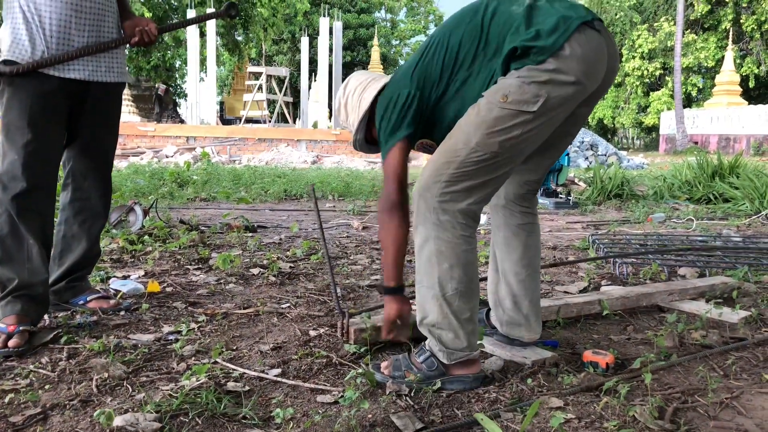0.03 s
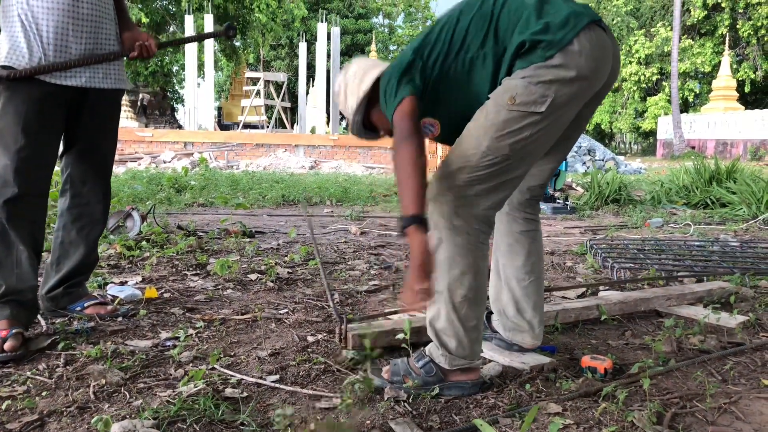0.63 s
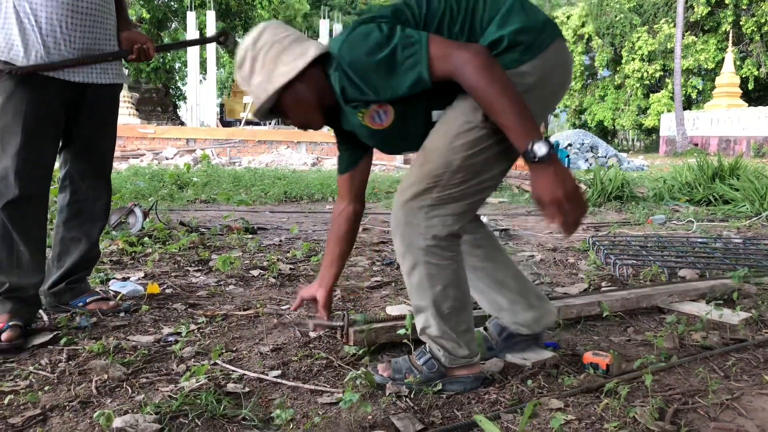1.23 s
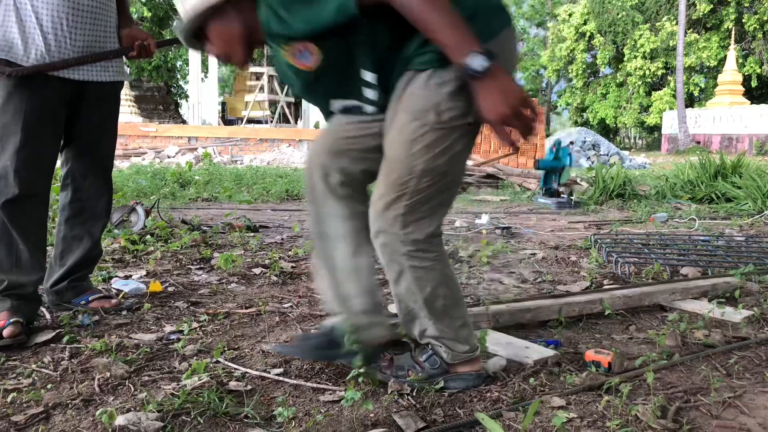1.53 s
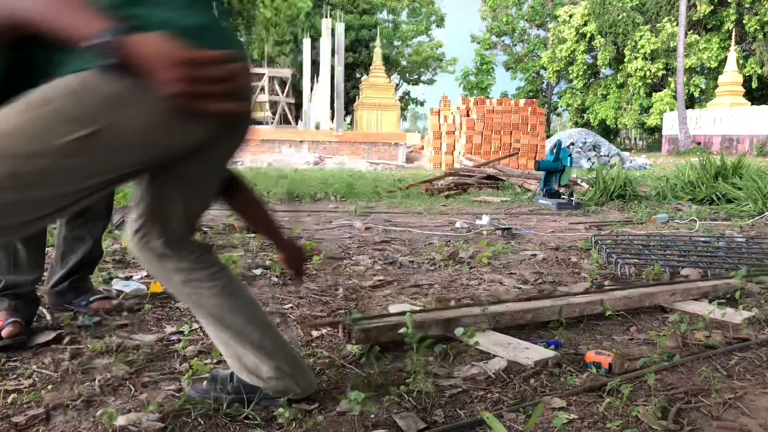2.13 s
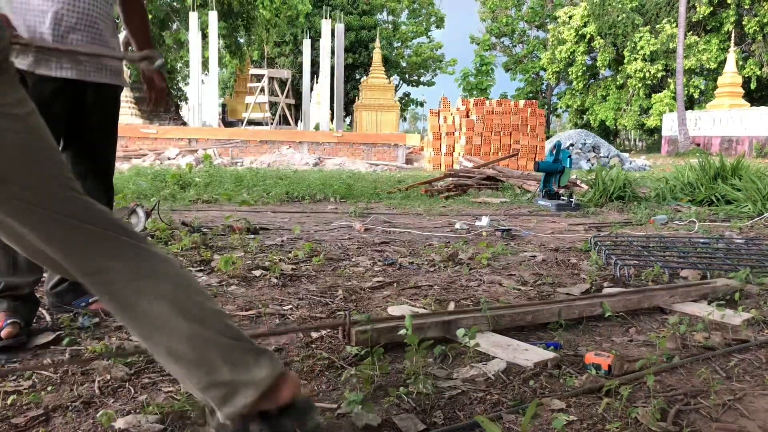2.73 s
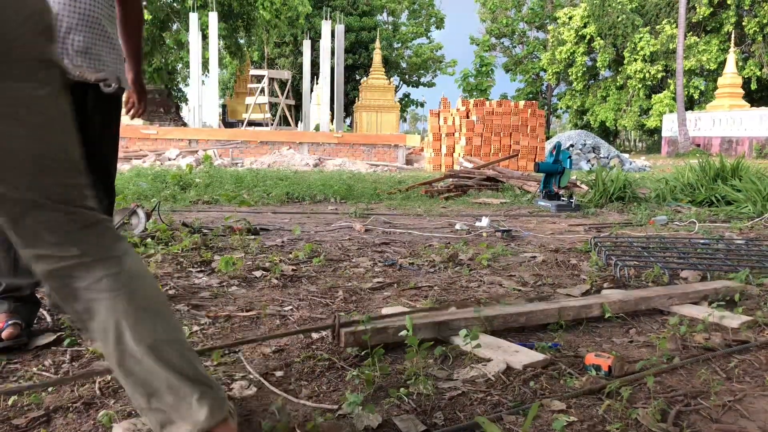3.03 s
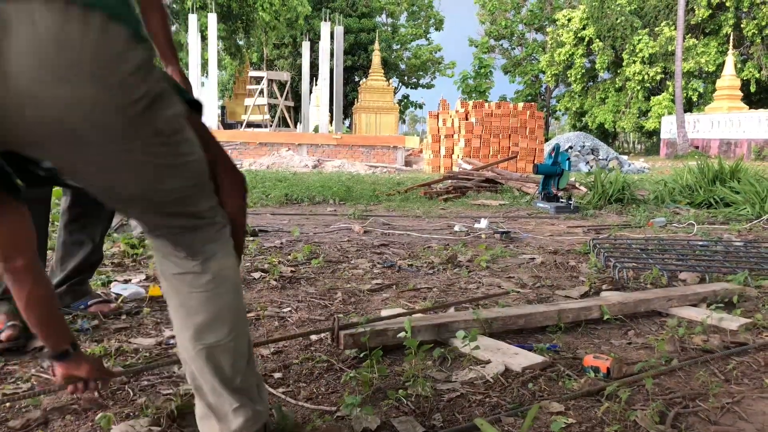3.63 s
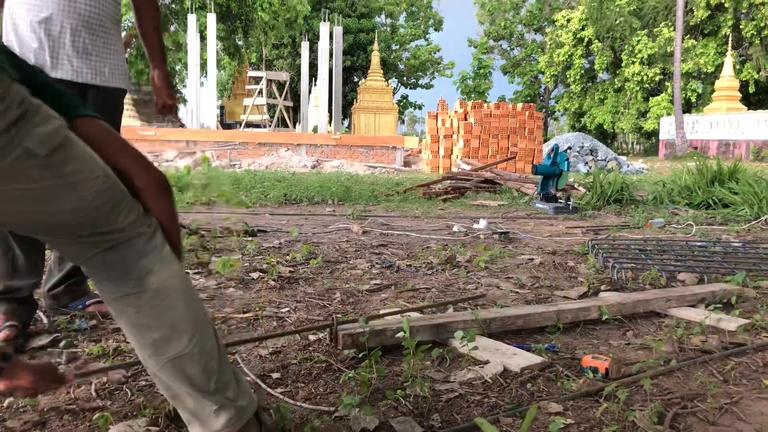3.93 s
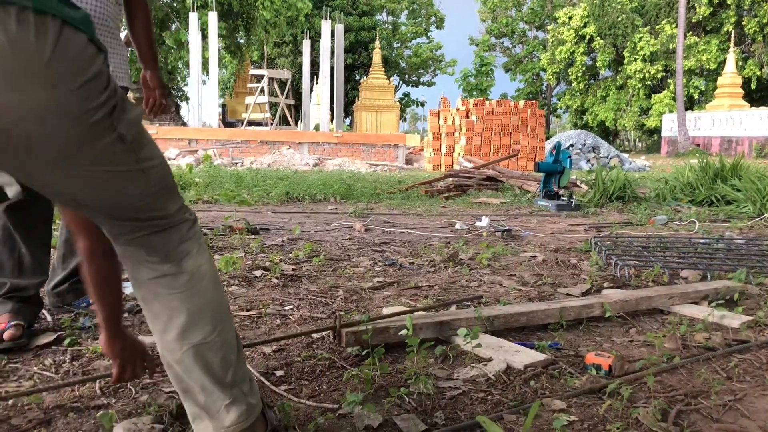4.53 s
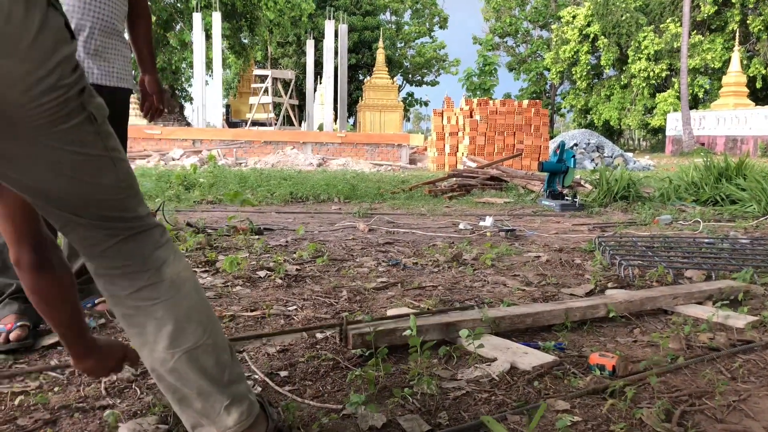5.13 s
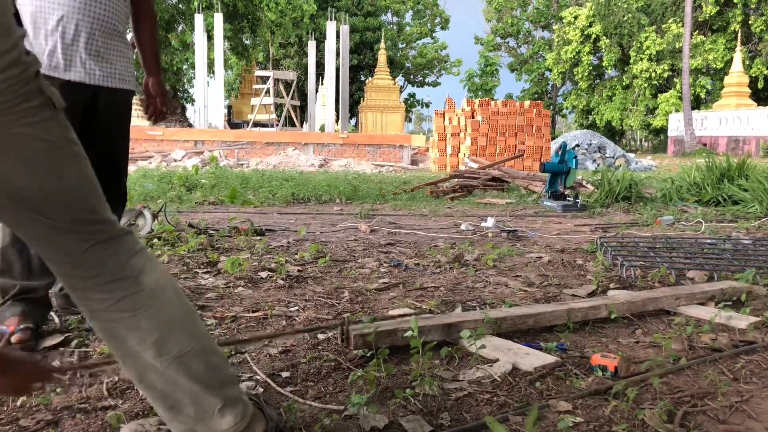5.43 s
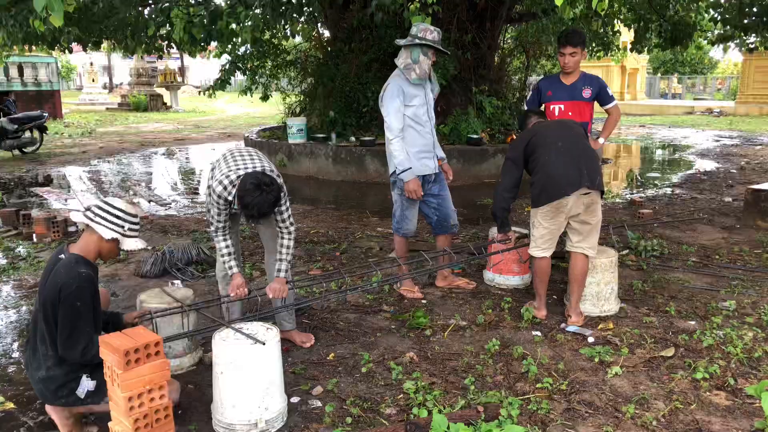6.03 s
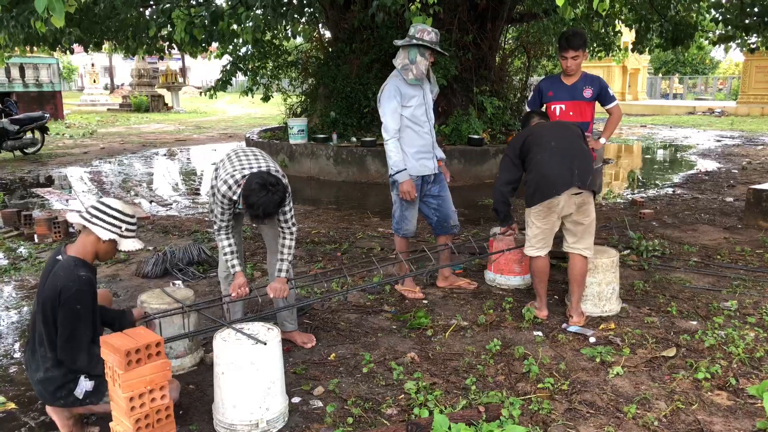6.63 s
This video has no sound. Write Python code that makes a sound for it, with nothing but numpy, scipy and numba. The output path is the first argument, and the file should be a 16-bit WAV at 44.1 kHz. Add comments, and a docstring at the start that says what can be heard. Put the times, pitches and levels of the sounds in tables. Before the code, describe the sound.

Steel reinforcing bars are handled near the microphone on bare ground outdoors. A few wooden knocks and dull clacks come first, followed by a swelling metallic rasp with screeches, ringing and low chatter as a bar drags through the soil. Shuffling steps, a small scrape and several clinks lead to another harsh slide of steel on steel. It gives way suddenly to quieter outdoor air and light clicks of thin rods.

```python
"""Long steel reinforcing bars are drawn over each other and through a bending jig on a building site. Stick-
slip friction drives their bending modes, so they scrape and ring; impacts make them clink, and bare soil damps
them to a dull slap. A tool knocks on the timber jig; feet shuffle, and whipping bars thud low. Near the end the
scene changes to a quieter spot under trees, where thin bars click lightly together."""
import sys
import numpy as np
from scipy import signal
from scipy.fft import rfft, irfft
from scipy.io import wavfile
from scipy.ndimage import uniform_filter1d, map_coordinates
from numba import njit

SR = 44100
rng = np.random.default_rng(int(sys.argv[2]) if len(sys.argv) > 2 else 0)


def waveform_to_disk(signal):
    """Save audio, clipped to [-1, 1], as 16-bit WAV at the path in sys.argv[1]."""
    frames = np.transpose(np.atleast_2d(signal))
    scaled = np.clip(frames, -1, 1) * 32767
    samples = np.round(scaled).astype(np.int16)
    wavfile.write(sys.argv[1], SR, samples)


N = 303849
T = np.arange(N) / SR
SCENE_CHANGE_S = 6.087
HAND_BAR_HZ = 1.1505  # base of the mode series of the bar in the hand

# The longest-ringing modes of the bar in the hand, in Hz.
HAND_MODES = [2342, 3600, 4177, 4400, 4570, 5030, 5240, 5954, 6320, 6580, 7520, 10372]
# Spectral envelope of the steel. Each row: frequency in Hz, relative level in dB.
STEEL = [(280, -28.5), (590, -6.5), (1000, -6), (1350, -7.5), (1730, -4), (2250, -6), (3980, -1.5),
         (8650, -9.5), (15100, -25.5)]
# A bar slaps soil or timber. Each row: start in seconds, level in dB, band centre in Hz.
SLAPS = [(.003, -33, 514), (.088, -35, 500), (.987, -25.5, 845), (1.009, -22, 730), (1.116, -34, 560),
         (1.338, -34.5, 586), (1.401, -35.5, 540), (1.438, -31, 564), (2.01, -32, 585), (2.049, -31, 650),
         (3.377, -21, 1010), (3.883, -31.5, 890), (4.875, -23.5, 1470), (4.898, -26.5, 845),
         (5.52, -22, 890), (5.735, -16.5, 790), (6.49, -43, 930), (6.665, -41.5, 1000)]
# A dragged bar meets a clod. Each row: start and length in seconds, level in dB, band centre in Hz.
BUMPS = [(2.108, 0.053, -26, 730), (2.159, 0.032, -21.5, 644), (2.231, 0.1, -29.5, 610),
         (2.538, 0.048, -21.5, 680), (2.646, 0.0088, -17, 770), (2.742, 0.061, -18, 767),
         (2.875, .045, -19, 650), (2.928, 0.044, -10, 600), (3.018, 0.017, -17, 610),
         (3.076, 0.041, -13, 517), (3.145, 0.014, -21, 625), (3.224, 0.027, -16.5, 635),
         (4.001, 0.043, -29, 746), (4.105, 0.034, -29.5, 780)]
# Steel slides on steel. Each row: start, fastest moment and stop in seconds, drive level in dB,
# rise and fall in dB per second, bass shelf and treble offset in dB, dB of treble lost per dB
# of level, relative level of the soil's grinding in dB.
SLIDES = [(2.098, 2.796, 2.9, -16.5, 20.5, 10, -2.5, -4, 0, -14),
          (2.846, 3.037, 5, -14.5, 3, 46.5, -4.5, -1.5, .4, -8.5),
          (3.846, 4.021, 4.21, -28.5, 53, 83, -3.5, -4, 0, -10.5),
          (5.176, 5.622, 5.75, -17, 58, 80, 1.5, -3, 0.8, -7),
          (5.65, 5.724, 6.15, -13, 75, 37.5, -1.5, -1, 1.5, -21)]


def undb(db):
    """Amplitude ratio for a level in decibels."""
    return 10 ** (np.asarray(db) / 20)


def unit(x):
    """Normalisation to an rms of 1."""
    return x / np.sqrt(np.mean(x ** 2))


def unit_energy(x):
    """A response of unit energy preserves the power of white noise."""
    return x / np.sqrt(np.sum(x ** 2))


def add(out, start_s, x):
    """Superposition of a short sound on the mix."""
    i = max(int(start_s * SR), 0)
    out[i:i + len(x)] += x[:N - i]


def peak_level(x, db, size=220):
    """Scaling that brings the highest short-time rms to the given level."""
    return x * undb(db) / np.sqrt(uniform_filter1d(x ** 2, size).max())


def colour(x, spectrum, size=4096):
    """Minimum-phase filter through (Hz, dB) points, built by folding the cepstrum."""
    hz, db = np.transpose(spectrum)
    grid = np.maximum(np.fft.rfftfreq(size, 1 / SR), 1)
    magnitude = undb(np.interp(np.log(grid), np.log(hz), db))
    cepstrum = irfft(np.log(magnitude))
    cepstrum[1:size // 2] *= 2
    cepstrum[size // 2 + 1:] = 0
    response = irfft(np.exp(rfft(cepstrum)))
    return signal.oaconvolve(x, response)[:len(x)]


def band(x, hz, ratio, order=2):
    """Band-pass filter from hz / ratio to hz * ratio."""
    edges = [hz / ratio, min(hz * ratio, SR / 2 - 1000)]
    return signal.sosfilt(signal.butter(order, edges, "band", fs=SR, output="sos"), x)


def brighten(x, db, corner_hz=7500):
    """Treble shelf: a harder contact carries more high-frequency energy."""
    top = signal.sosfiltfilt(signal.butter(3, corner_hz, "high", fs=SR, output="sos"), x)
    return x + (undb(db) - 1) * top


def walk(rate):
    """Smooth random modulation of rms 1, with `rate` new values a second."""
    step = int(SR / rate)
    stairs = np.repeat(rng.standard_normal(N // step + 1), step)[:N]
    return unit(uniform_filter1d(stairs, step))


def hump(middle_s, length_s):
    """Half-cosine envelope that swells and fades."""
    return np.cos(np.pi * np.clip((T - middle_s) / length_s, -.5, .5))


def swells(rows):
    """Summed envelope of several humps, each at its own level."""
    return sum(undb(db) * hump(middle, length) for middle, length, db in rows)


def friction(rate, spread_db, judder_db, judder_rate):
    """Stick-slip force: tiny uneven impulses, `rate` a second, come in fits as ribs and grit catch."""
    hits = (rng.random(N) < rate / SR) * rng.standard_normal(N)
    strength_db = spread_db * rng.standard_normal(N) + judder_db * np.tanh(walk(judder_rate))
    return unit(hits * undb(strength_db))


def crack(t60, size=SR):
    """Contact transient: noise that decays exponentially, by 60 dB in t60 seconds."""
    decay = np.exp(-np.log(1000) * T[:size] / t60)
    return unit_energy(rng.standard_normal(size) * decay)


@njit
def ring(hz, gain, t60, size):
    """Free vibration as a sum of damped sinusoids."""
    out, phasors = np.zeros(size), gain + 0j
    pole = np.exp((2j * np.pi * hz - np.log(1000) / t60) / SR)
    for i in range(size):
        for k in range(len(phasors)):
            phasors[k] *= pole[k]
            out[i] += phasors[k].imag
    return out


def bar(base_hz, t60, split=0.0041, damping_hz=11000, size=SR):
    """Bending modes of a rod rise with the square of their number, a little slower at the top."""
    hz = base_hz * (np.arange(12, 122) + .5) ** 2
    hz = hz / np.sqrt(1 + hz / 200000)
    # the ribs give the second bending plane a weaker set of slightly detuned modes
    weight = np.outer([1, .5], hz ** .25).ravel()
    hz = np.concatenate([hz, hz * (1 + split * rng.standard_normal(len(hz)))])
    # the point of contact decides how strongly each mode takes part
    gain = weight * np.cos(2 * np.pi * rng.random(len(hz)))
    return unit_energy(ring(hz, gain, t60 / (1 + (hz / damping_hz) ** 2), size))


def strong_modes(modes, t60, damping_hz=11000):
    """A few prominent resonances; damping grows with frequency, so high ones are weak and brief."""
    hz = np.array(modes, float)
    rolloff = 1 / (1 + (hz / damping_hz) ** 2)
    return unit_energy(ring(hz, rolloff * rng.choice([-1, 1], len(hz)), t60 * rolloff, SR))


def effort(slide):
    """Level follows sliding speed: in dB, a steady rise to 0 at the fastest moment, then a fall."""
    _, fastest, _, _, rise, sag = slide[:6]
    return -rise * np.maximum(fastest - T, 0) - sag * np.maximum(T - fastest, 0)


def stroke(slide, grip_s=0.061, let_go_s=0.091):
    """Amplitude envelope of a slide, from taking hold to coming to rest."""
    start, _, stop, db = slide[:4]
    moving = np.clip((T - start) / grip_s, 0, 1) * np.clip((stop - T) / let_go_s, 0, 1)
    return moving * undb(db + effort(slide))


def outdoors(spectrum, db, waver_db=1.1):
    """Leaves and distant traffic add incoherently to a gently wavering, coloured noise."""
    return unit(colour(rng.standard_normal(N), spectrum)) * undb(db + waver_db * walk(rate=7))


def site_air():
    """Broadband ambient noise on the open site."""
    # Ambient spectrum. Each row: frequency in Hz, relative level in dB.
    air_spectrum = [(25, -8.5), (75, 1), (364, -2), (569, -3.5), (3870, -9), (8980, -18.5), (16000, -25.5)]
    # Ambient loudness. Each row: time in seconds, level in dB.
    air_level = [(0, -48), (3.8, -50), (4.3, -45.5)]
    times, levels_db = np.transpose(air_level)
    return outdoors(air_spectrum, np.interp(T, times, levels_db))


def shade_air():
    """Ambient noise under the trees, weighted to low frequencies."""
    # Ambient spectrum. Each row: frequency in Hz, relative level in dB.
    shade_spectrum = [(18, -45), (30, -10), (59, -2), (245, -8), (473, -20), (666, -16), (1070, -14),
                      (1430, -29), (3000, -25), (16000, -39.5)]
    return outdoors(shade_spectrum, db=-46)


def rustles():
    """Dry leaves and grit, brushed by hands and bars, emit fits of tiny impulses."""
    # Brushing movements. Each row: middle and length in seconds, level in dB.
    brushes = [(.11, 0.13, -49.5), (.36, 0.039, -49.5), (.555, 0.036, -53), (5.22, 0.022, -44),
               (6.125, .07, -50.5), (6.48, .1, -53)]
    crackle = friction(rate=3000, spread_db=1, judder_db=7, judder_rate=60)
    return swells(brushes) * unit(band(crackle, hz=5200, ratio=1.78))


def grind(gain, grit_db, lumps_rate, lumps_db=2.5):
    """Friction on soil grinds it and cracks grit; lumps modulate the amplitude."""
    # Spectrum of grinding soil. Each row: frequency in Hz, relative level in dB.
    soil_spectrum = [(200, -23), (462, -0.5), (600, 4), (824, -2.5), (1200, -6.5), (2000, -7), (2800, -58)]
    soil_force = friction(rate=1500, spread_db=1, judder_db=1.5, judder_rate=70)
    grit_force = friction(rate=600, spread_db=3, judder_db=3, judder_rate=25)
    soil = unit(colour(soil_force, soil_spectrum))
    grit = unit(band(grit_force, hz=4500, ratio=2))
    lumps = unit(undb(lumps_db * walk(lumps_rate)))
    return gain * lumps * (soil + undb(grit_db) * grit)


def shuffles(rumble_db=-2, soil_db=-9, resting_db=-53):
    """Each shift of stance swells a low, uneven rumble and adds the friction of soles on soil."""
    # Movements of feet and clothes. Each row: middle and length in seconds, base level in dB.
    shifts = [(0.12, 0.23, -42), (1.85, 0.15, -36), (2.392, 0.21, -33), (3.247, 0.73, -31.5),
              (4.13, 0.47, -34.5), (4.476, 0.17, -35.5), (4.918, 0.34, -28.5), (5.183, 0.3, -30),
              (5.656, 0.87, -33.5), (6.59, 0.43, -46)]
    # Spectrum of the rumble. Each row: frequency in Hz, relative level in dB.
    feet_spectrum = [(21, -30), (35, -13), (59, 1), (140, 0), (258, -3), (400, -11), (700, -73.5)]
    moving = swells(shifts)
    uneven_noise = rng.standard_normal(N) * undb(4.3 * walk(rate=35))
    rumble = unit(colour(uneven_noise, feet_spectrum))
    scuff = grind(moving * undb(soil_db), grit_db=-14, lumps_rate=35)
    return (moving * undb(rumble_db) + undb(resting_db)) * rumble + scuff


def thuds(boost_db=1.5, glide_s=0.0108, peak_s=0.011, scuff_t60=0.099, size=9000):
    """A soft impact excites only low frequencies: a few cycles that sink in pitch, and a scuff."""
    # Low thuds of a whipping bar, a slow bending wave. Each row: start in seconds, level before the boost in
    # dB, nominal pitch in Hz.
    whip_thuds = [(1.615, -40, 190), (1.773, -27, 89), (1.822, -31, 177), (2.901, -23.5, 311),
                  (3.148, -26, 327), (3.275, -26.5, 150), (3.312, -24.5, 87), (3.506, -32.5, 129),
                  (4.3, -24, 147.4), (4.374, -32, 172), (4.431, -35, 230), (4.543, -30, 210),
                  (4.624, -25.5, 139), (4.675, -34, 186), (4.969, -28.5, 143), (5.144, -31.5, 212),
                  (5.22, -33, 162), (5.722, -25, 242)]
    out, t = np.zeros(N), T[:size]
    swell = (t / peak_s * np.exp(1 - t / peak_s)) ** 3
    for start, hit_db, hz in whip_thuds:
        sinking_hz = hz * (0.72 + 0.96 * np.exp(-t / glide_s))
        phase = 2 * np.pi * np.cumsum(sinking_hz) / SR
        thump = unit_energy(swell * np.sin(phase))
        scuff = unit_energy(band(crack(scuff_t60, size), hz, ratio=1.75))
        add(out, start, peak_level(thump + 1.04 * scuff, hit_db + boost_db))
    return out


def taps(t60=0.015, tail_t60=0.25, rise_s=0.00078):
    """Impact of the bending tool on the timber jig: a crack, a damped hollow resonance and a tail."""
    # Knocks. Each row: start in seconds, level in dB, band centre in Hz, crack and tail in relative dB.
    knocks = [(.733, -21, 1360, -10, -15), (0.757, -20.5, 2600, 0, -6), (1.437, -32.5, 1750, 0, -5),
              (1.848, -32, 1000, -9.5, 0), (2.048, -31, 1600, 1, -1)]
    # Resonances of tool and timber, in Hz.
    timber_modes = [1060, 1675, 1970, 3220, 3350]
    out, attack = np.zeros(N), 1 - np.exp(-T[:SR] / rise_s)
    for start, hit_db, hz, crack_db, tail_db in knocks:
        body = strong_modes(timber_modes, t60) + undb(tail_db) * strong_modes(timber_modes, tail_t60)
        snap = unit_energy(band(crack(t60=0.034), hz=1200, ratio=2.15, order=1))
        hit = unit_energy(band(body, hz, ratio=1.26, order=1)) + undb(crack_db) * snap
        add(out, start, peak_level(hit * attack, hit_db))
    return out


def ploughing():
    """Friction of each sliding bar's far end in the soil follows the envelope of its stroke."""
    drag = sum(stroke(slide) * undb(soil_db) for *slide, soil_db in SLIDES)
    return grind(drag, grit_db=-19, lumps_rate=55)


def bumps(rise_s=0.0041, release_t60=0.043, t60=0.05, crunch_db=-3, size=12000):
    """Forced vibration: a dragged bar chatters over a clod, which drives its low, choked modes."""
    out, t = np.zeros(N), T[:size]
    for start, length, hit_db, hz in BUMPS:
        release = np.exp(-np.log(1000) * np.maximum(t - length, 0) / release_t60)
        contact = np.minimum(t / rise_s, 1) * release
        body = bar(HAND_BAR_HZ, t60, size=size) + undb(crunch_db) * crack(t60 / 2, size)
        chatter = signal.fftconvolve(contact * rng.standard_normal(size), body)[:size]
        add(out, start, peak_level(band(chatter, hz, ratio=1.71), hit_db))
    return out


def slaps(crunch_db=-4, settle_db=-9, rise_s=0.0008, size=16000):
    """Soil damps a bar at once, leaving a dull clack, a crunch and crumbs that settle."""
    out, attack = np.zeros(N), 1 - np.exp(-T[:size] / rise_s)
    for start, hit_db, hz in SLAPS:
        crunch = undb(crunch_db) * crack(t60=0.35, size=size)
        crumbs = undb(settle_db) * crack(t60=0.43, size=size)
        clack = bar(base_hz=1.15, t60=0.13, size=size)
        hit = (clack + crunch + crumbs) * attack
        add(out, start, peak_level(band(hit, hz, ratio=1.74), hit_db))
    return out


def clinks(treble_db=8, hand_db=-4, thin_db=-11):
    """Two bars collide with a crack, then vibrate freely until hand or soil damps them."""
    # Collisions. Each row: start in seconds, level in dB, treble offset in dB, decay time in seconds.
    collisions = [(.666, -35, -2, 0.036), (0.797, -41, 5, 0.4), (1.016, -28, -4, 0.76),
                  (2.65, -22, -3, 0.057), (2.929, -7.5, 1, 0.045), (3.372, -27, -6, 0.65),
                  (4.875, -22.5, 0, 0.11), (4.896, -22, -5, .14), (5.039, -30.5, -14, 0.39),
                  (5.272, -24, -11, 0.53), (5.344, -13, -0.5, 0.52), (6.526, -33, -1, 0.22),
                  (6.651, -39.5, -20, 0.066), (6.76, -31, 1.5, 0.11)]
    # Resonances of the thin bars under the trees, in Hz.
    thin_modes = [3360, 4760, 6500, 9109, 9900, 10840, 13000, 14500]
    out = np.zeros(N)
    for start, hit_db, top_db, t60 in collisions:
        rods = bar(HAND_BAR_HZ, t60) + .5 * bar(1.3, t60) + .5 * crack(t60 / 3)
        if start < SCENE_CHANGE_S:
            tones = undb(hand_db) * strong_modes(HAND_MODES, t60)
        else:
            tones = undb(thin_db) * strong_modes(thin_modes, t60=0.43)
        hit = unit_energy(colour(rods, STEEL)) + tones
        add(out, start, peak_level(brighten(hit, top_db + treble_db), hit_db))
    return out


def waver(x, shift, rate):
    """Frequency modulation: moving contacts pull the modes up and down by the rms fraction `shift`."""
    position = np.cumsum(1 + shift * walk(rate)).clip(0, N - 1)
    return map_coordinates(x, [position], order=5)


def screeches():
    """A rib catches on a steel edge, and stick-slip drives one band of the bar's modes."""
    # Catching ribs. Each row: middle and length in seconds, level in dB, band centre in Hz.
    catches = [(2.793, 0.18, -15.5, 4300), (2.772, 0.067, -16.5, 8200), (2.884, 0.076, -16, 5200),
               (3.056, 0.18, -14, 8030), (3.153, 0.14, -19, 6460), (3.981, 0.043, -29, 4430),
               (5.608, 0.16, -19.5, 3920), (5.76, .13, -17.5, 6600)]
    out = np.zeros(N)
    force = friction(rate=5000, spread_db=1, judder_db=3, judder_rate=90)
    for middle, length, level_db, hz in catches:
        voice = unit_energy(band(bar(HAND_BAR_HZ, t60=0.14), hz, ratio=1.27))
        out += signal.oaconvolve(force * hump(middle, length) * undb(level_db), voice)[:N]
    return waver(out, shift=.003, rate=40)


def jolts(most_db=1.5, peak_s=0.05):
    """Each bounce on the ground briefly raises the friction of a sliding bar; the rise is in dB."""
    ages = (np.maximum(T - start, 0) / peak_s for start, *_ in SLAPS + BUMPS)
    return most_db * np.minimum(sum(age * np.exp(1 - age) for age in ages), 1)


def travelling_contact(force, bars, rasp_db, wander_db=6, points=3):
    """Modal coupling changes as the contact travels along the bars, given as (base Hz, t60 s)."""
    shares = undb([wander_db * walk(rate=18) for _ in range(points)])
    out = 0
    for share in shares / np.linalg.norm(shares, axis=0):
        body = sum(bar(hz, t60) for hz, t60 in bars) + undb(rasp_db) * crack(t60=0.022)
        response = unit_energy(colour(body, STEEL))
        out = out + signal.oaconvolve(force * share, response)[:N]
    return out


def scrape(slide, bite_db, bars, rasp_db, modes, modes_db, t60, treble_db=8.0, flicker_db=2.5):
    """Friction drives the steel's resonances, brighter the faster it slides and the harder it bites."""
    *_, low_db, offset_db, dulling, _ = slide
    resonance = undb(modes_db) * strong_modes(modes, t60)
    force = friction(rate=1800, spread_db=3, judder_db=4, judder_rate=65) * stroke(slide) * undb(bite_db)
    top_db = treble_db + offset_db + dulling * (effort(slide) + bite_db)
    top_db += flicker_db * np.tanh(walk(rate=16))
    force = brighten(force, top_db, corner_hz=8060)
    bass_shelved = undb(low_db) * brighten(force, -low_db, corner_hz=2570)
    return travelling_contact(bass_shelved, bars, rasp_db) + signal.oaconvolve(force, resonance)[:N]


def pulls():
    """Five slides of steel on steel; in three, contact couples in a neighbour of another length."""
    # Prominent resonances of bars lying on each other in the jig, in Hz.
    jig_modes = [3220, 3700, 3989, 4000, 4210, 4880, 5663, 5968]
    # Resonances of a lightly nudged bar, in Hz.
    nudge_modes = [4000, 4183, 6300, 10498, 10740]
    # Resonances of the whole bundle, in Hz.
    bundle_modes = [656.8, 706, 2562, 5188, 5916, 6691, 7101, 7639]
    bite_db = jolts()
    first = scrape(SLIDES[0], bite_db, bars=[(1.433, .28), (HAND_BAR_HZ, .28)], rasp_db=2,
                   modes=jig_modes, modes_db=-5.5, t60=0.71)
    run_out = scrape(SLIDES[1], bite_db, bars=[(HAND_BAR_HZ, .42)], rasp_db=0,
                     modes=HAND_MODES, modes_db=-10, t60=1.22)
    nudge = scrape(SLIDES[2], bite_db, bars=[(HAND_BAR_HZ, .25)], rasp_db=3,
                   modes=nudge_modes, modes_db=-9.5, t60=0.3)
    shove = scrape(SLIDES[3], bite_db, bars=[(1.1, .34), (HAND_BAR_HZ, .41)], rasp_db=3.5,
                   modes=bundle_modes, modes_db=-8.5, t60=0.069)
    last = scrape(SLIDES[4], bite_db, bars=[(1.228, .7), (HAND_BAR_HZ, .5)], rasp_db=1,
                  modes=bundle_modes, modes_db=-5.5, t60=0.3)
    return waver(first + run_out + nudge + shove + last, shift=0.001016, rate=49)


def scene():
    """Superposition of the sources: the site gives way to the trees; knocks and feet sound in both."""
    site_fade = np.clip((SCENE_CHANGE_S - T) / 0.036, 0, 1)
    shade_fade = np.clip((T - SCENE_CHANGE_S) / 0.016, 0, 1)
    site = (pulls() + screeches() + ploughing() + site_air()) * site_fade
    shade = shade_air() * shade_fade
    return (site + shade + shuffles() + rustles() + clinks() + slaps() + bumps() + taps() + thuds())[None]


def record(dry, ceiling=0.92, top_hz=16000):
    """Soft saturation rounds the highest peaks, and a steep low-pass filter cuts the top."""
    rounded = dry / (1 + (dry / ceiling) ** 8) ** (1 / 8)
    return signal.sosfilt(signal.ellip(10, .2, 80, top_hz, fs=SR, output="sos"), rounded)


dry = scene()
out = record(dry)
waveform_to_disk(out)
```